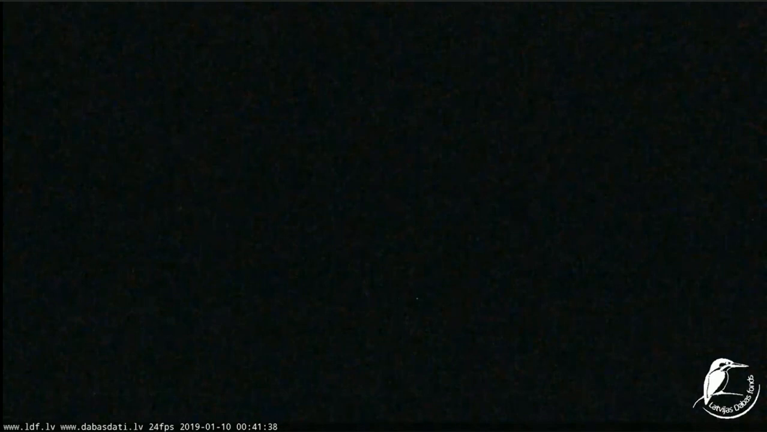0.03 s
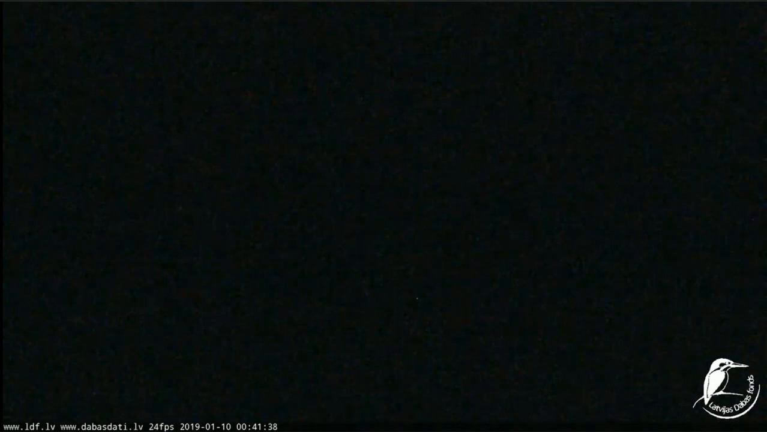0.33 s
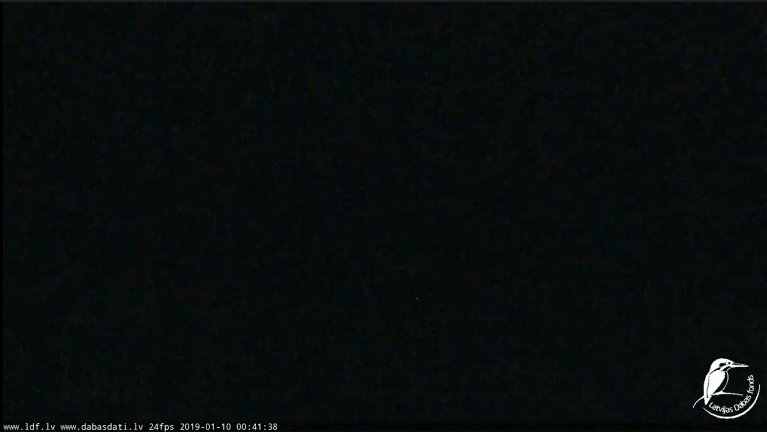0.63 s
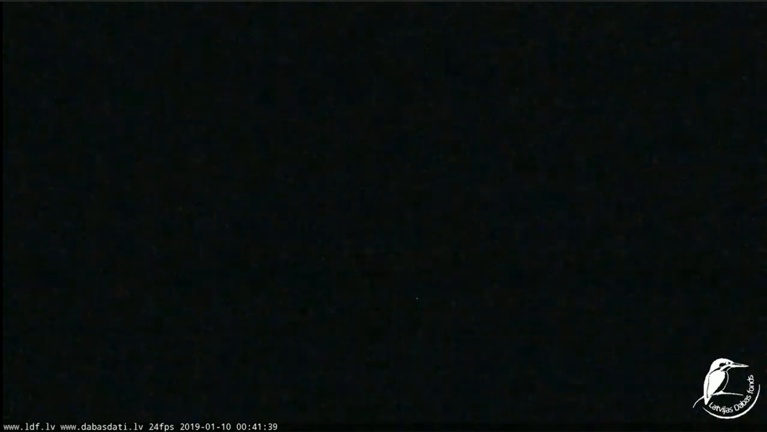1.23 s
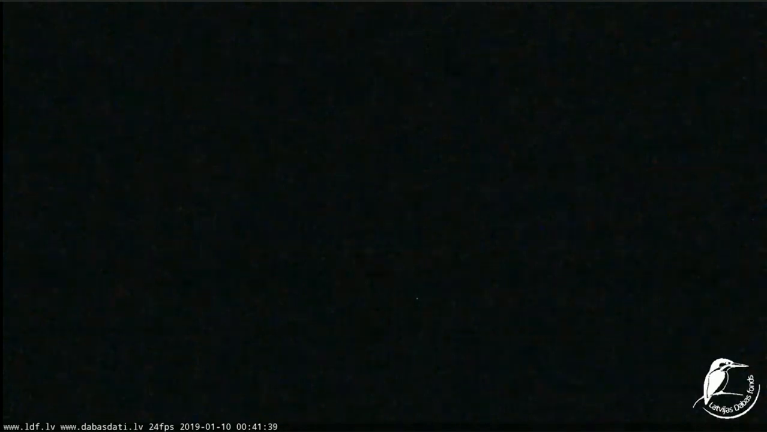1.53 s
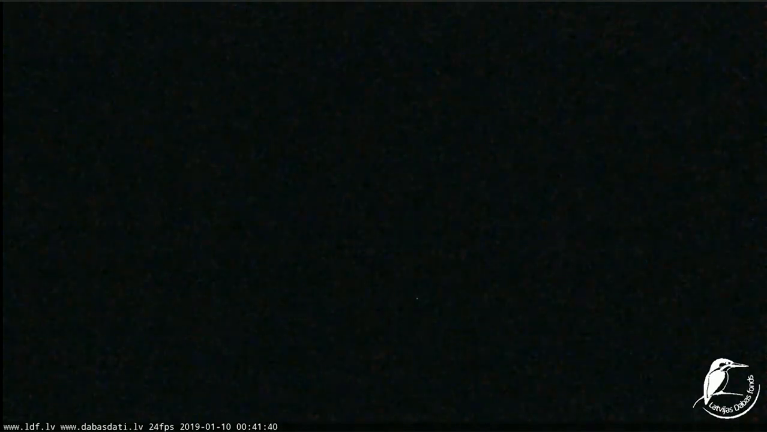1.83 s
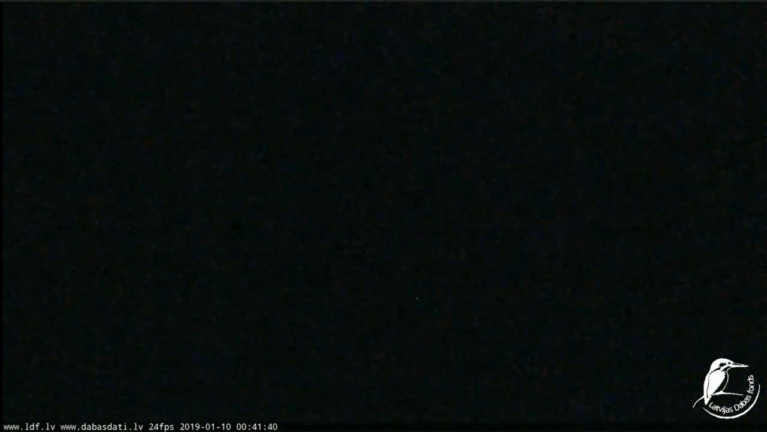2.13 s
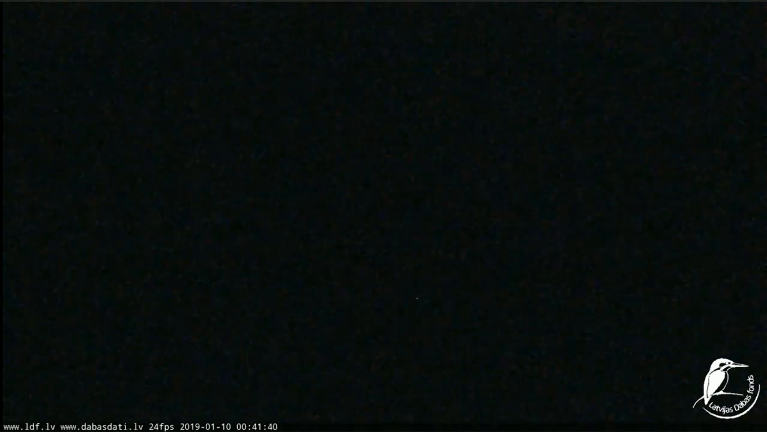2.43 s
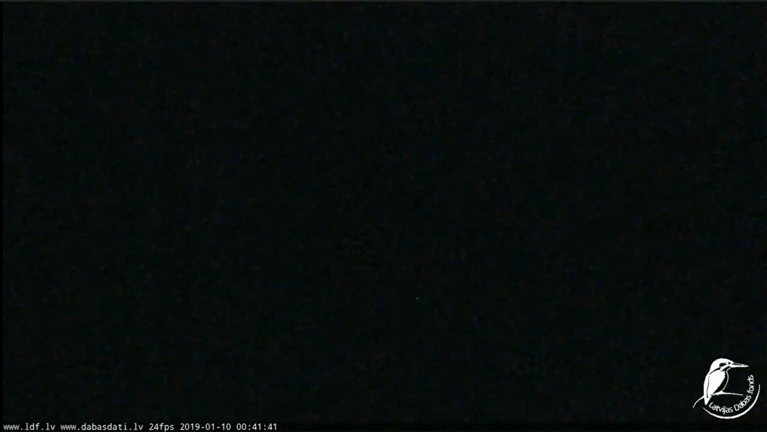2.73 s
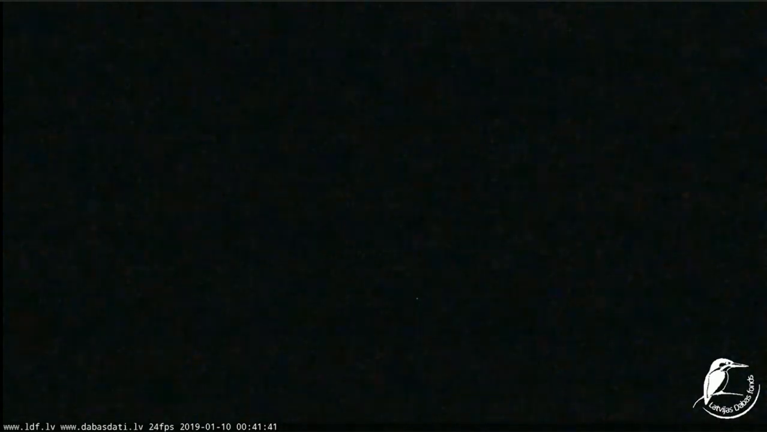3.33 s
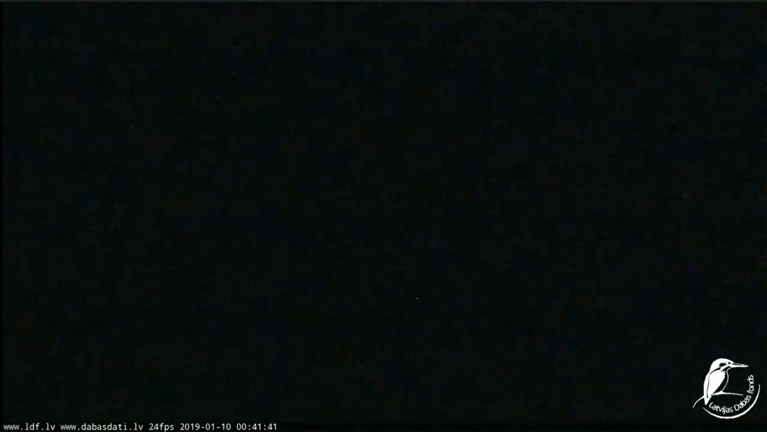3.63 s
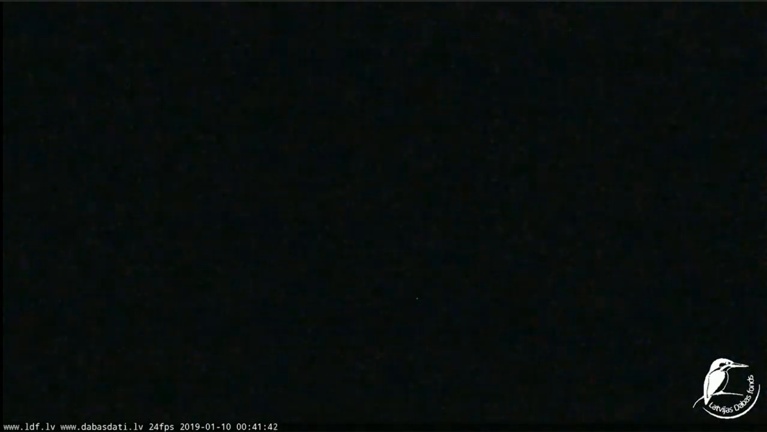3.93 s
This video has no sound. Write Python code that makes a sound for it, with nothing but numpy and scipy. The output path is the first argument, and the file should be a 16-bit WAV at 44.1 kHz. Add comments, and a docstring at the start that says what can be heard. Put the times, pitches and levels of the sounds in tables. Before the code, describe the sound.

An animal's drawn-out call of creaky trills and thin whistles in a hissing night forest.

```python
"""An unseen animal gives one long wavering call in a night forest, off among the trees.
It starts as a creaky trill of tiny pips, holds a thin whistle that turns rough and loud,
trills again, squeaks once and trails off. Near trunks scatter the call and far trees give it a
soft tail. Under it lie a low rumble of air and the steady hiss of the microphone."""
import sys
import numpy as np
from scipy import signal
from scipy.fft import rfft, irfft
from scipy.io import wavfile

SR = 44100
rng = np.random.default_rng(int(sys.argv[2]) if len(sys.argv) > 2 else 0)


def wrap_up_sound(samples):
    """Save the sound to the file named by the first command line argument, as 16-bit audio."""
    columns = np.atleast_2d(samples).T
    # keep every value between -1 and 1, then stretch to whole-number steps
    tamed = np.clip(columns, -1, 1)
    steps = np.round(tamed * 32767).astype(np.int16)
    wavfile.write(sys.argv[1], SR, steps)


N = 176400


def undb(db):
    """Decibels to gain."""
    return 10 ** (np.asarray(db) / 20)


def curve(rows):
    """A table of times and values, joined by straight lines."""
    times, values = np.array(rows).T
    return np.interp(np.arange(N) / SR, times, values)


def flutter(width_hz):
    """Complex noise of rms 1 in a steep-sided band round zero."""
    f = np.fft.fftfreq(N, 1 / SR)
    band = 1 / np.sqrt(1 + (2 * f / width_hz) ** 6)
    white = rng.standard_normal(N) + 1j * rng.standard_normal(N)
    noise = np.fft.ifft(np.fft.fft(white) * band)
    return noise / np.std(noise)


def wander(rate_hz):
    """Random drift with spread 1."""
    return np.sqrt(2) * flutter(2 * rate_hz).real


def oscillator(hz):
    """Complex unit tone that follows a pitch curve."""
    return np.exp(2j * np.pi * np.cumsum(hz) / SR)


def gate(start_s, end_s, edge_s=0.023):
    """Open between two times, with soft edges."""
    t = np.arange(N) / SR
    return np.clip(np.minimum(t - start_s, end_s - t) / edge_s + .5, 0, 1)


def air_and_hiss():
    """Even microphone hiss over a rumble of air that keeps rising gently into the deep bass."""
    # spectrum of air and microphone together: frequency_hz, relative_level_db
    noise_floor = [(100, 0.5), (150, -3.5), (250, -6), (400, -9.5), (700, -12.5), (1200, -16), (2500, -19),
                   (5000, -21), (10000, -22), (14000, -23)]
    knee_hz, rumble_db_per_octave, audible_db = 110, 4.2, -42
    f = np.fft.rfftfreq(N, 1 / SR)
    hz, db = np.array(noise_floor).T
    shape_db = np.interp(np.log(np.maximum(f, knee_hz)), np.log(hz), db)
    octaves_below = np.log2(knee_hz / np.clip(f, 10, knee_hz))
    spectrum = rfft(rng.standard_normal(N)) * undb(shape_db + rumble_db_per_octave * octaves_below)
    audible_rms = np.std(irfft(spectrum * ((f > 100) & (f < 13000)), N))
    return undb(audible_db) * irfft(spectrum, N) / audible_rms


def trill():
    """The voice breaks into short falling pips, with a rasp of hoarse air between them."""
    # runs of evenly spaced pips: start_s, end_s, pips_per_s, relative_rasp_db
    pip_runs = [(.957, .99, 43.5, -16), (1.046, 1.09, 48, -14), (1.110, 1.17, 41, -16),
                (1.350, 1.43, 43.2, -18), (1.445, 1.53, 40, -14), (2.531, 2.59, 39.5, -16),
                (2.595, 2.72, 60.6, -14), (2.728, 2.98, 53, -14), (2.991, 3.21, 61.5, -14),
                (3.576, 3.62, 53, -17), (3.635, 3.935, 45, -16)]
    # course of the trilling voice: time_s, pitch_hz, level_db
    contour = [(0.956, 1540, -47), (0.98, 1540, -38), (1.049, 1580, -43), (1.11, 1590, -37),
               (1.16, 1540, -41), (1.35, 1760, -32), (1.396, 1810, -28), (1.42, 1690, -34),
               (1.445, 1710, -41), (1.471, 1680, -33), (1.495, 1750, -28), (1.52, 1680, -36),
               (2.53, 1850, -31), (2.558, 2000, -28), (2.581, 1850, -31), (2.595, 1780, -33),
               (2.628, 1840, -34), (2.645, 1950, -28), (2.661, 1940, -27), (2.69, 1840, -33),
               (2.711, 1810, -38), (2.728, 1890, -34), (2.766, 1970, -27), (2.786, 1900, -36),
               (2.807, 1770, -32), (2.84, 1890, -28), (2.861, 1960, -29), (2.917, 2000, -30),
               (2.953, 1920, -28), (2.972, 1910, -28), (2.991, 1800, -30), (3.025, 1980, -24),
               (3.04, 1940, -24), (3.056, 1920, -28), (3.074, 1890, -30), (3.122, 2060, -22),
               (3.136, 2010, -23), (3.152, 1970, -29), (3.169, 1900, -33), (3.576, 2010, -30),
               (3.595, 1990, -27), (3.638, 1740, -36), (3.68, 1790, -34), (3.723, 1880, -30),
               (3.79, 1790, -34), (3.812, 1790, -32), (3.878, 1790, -38), (3.902, 1750, -36),
               (3.928, 1550, -44)]
    pip_gain_db, scatter_db, jitter_s, sag_hz_per_s = -1, 2, 0.00029, 25000
    rise_s, fall_s, reference_hz = 0.0015, 0.0026, 1970
    times, pitch, db = np.array(contour).T
    t = np.arange(N) / SR
    pips, rasp_gain = np.zeros(N), np.zeros(N)
    for start, end, rate, rasp_db in pip_runs:
        rasp_gain = np.maximum(rasp_gain, undb(rasp_db) * gate(start, end))
        chance = rng.standard_normal((32, 3))
        for at, (late, loud, phase) in zip(np.arange(start, end, 1 / rate), chance):
            hz = np.interp(at, times, pitch)
            near = np.abs(t - at) < .02
            from_peak_s = t[near] - at - jitter_s * late
            stretch = (hz / reference_hz) ** 1.5  # higher pips last longer
            width_s = np.where(from_peak_s < 0, rise_s, fall_s) * stretch
            peak = undb(np.interp(at, times, db) + pip_gain_db + scatter_db * loud)
            envelope = peak * np.exp(-.5 * (from_peak_s / width_s) ** 2)
            cycles = hz * from_peak_s - .5 * sag_hz_per_s * from_peak_s ** 2 + phase
            pips[near] += envelope * np.sin(2 * np.pi * cycles)
    rasp = (flutter(width_hz=490) * oscillator(np.interp(t, times, pitch))).real
    return pips + rasp_gain * undb(np.interp(t, times, db)) * rasp


def forest(call):
    """The direct call, quick scatter from near trunks, then a soft tail from the far trees."""
    trunks_s, trunks_db = .012, -15
    build_s, t60_s, tail_db = 0.01, 2, -10.5
    t = np.arange(2 * SR) / SR
    trunks = rng.standard_normal(len(t)) * t * np.exp(-t / trunks_s)
    tail = rng.standard_normal(len(t)) * (1 - np.exp(-t / build_s)) * np.exp(-np.log(1000) * t / t60_s)
    echo = undb(trunks_db) * trunks / np.linalg.norm(trunks) + undb(tail_db) * tail / np.linalg.norm(tail)
    return call + signal.fftconvolve(call, echo)[:N]


def whistle(contour):
    """A near-pure tone with a weak, breathy octave; under strain it turns hoarse and buzzes."""
    # hoarseness of the voice: time_s, roughness_share
    roughness = [(1.25, .7), (1.5, .4), (1.6, .12), (1.93, .1), (2.0, .8), (2.06, .75), (2.12, .9),
                 (2.17, .6), (2.2, .4), (2.225, .12), (2.26, .45), (2.28, .25), (2.32, .5), (3.24, .3)]
    # strength of the octave against the fundamental: time_s, level_db
    octave_level = [(1.25, -9), (1.55, -8.5), (1.68, -16), (1.76, -7), (1.86, -26), (2.03, -12),
                    (2.15, -26), (2.3, -34)]
    gain_db, wobble, hoarse_above_hz = -2.5, 0.00804, 110
    buzz_hz, buzz_db, octave_breath = 385, -16, 0.59
    t = np.arange(N) / SR
    times, pitch, db = np.array(contour).T
    tone = oscillator(np.interp(t, times, pitch) * (1 + wobble * wander(rate_hz=74)))
    hoarse = curve(roughness) * flutter(width_hz=620) * oscillator(np.full(N, hoarse_above_hz))
    # a second oscillator puts a line above the strained whistle
    buzz = oscillator(buzz_hz * (1 + 0.0284 * wander(rate_hz=39.5)))
    buzz *= undb(buzz_db) * gate(start_s=2.195, end_s=2.325)
    octave = undb(curve(octave_level)) * (1 + octave_breath * flutter(width_hz=200))
    voice = (tone + octave * tone ** 2) * (1 + hoarse + buzz)
    envelope = undb(np.interp(t, times, db) + gain_db) * gate(times[0], times[-1])
    return np.sqrt(2) * voice.real * envelope


def whistled_notes():
    """The unbroken notes of the call, all in the same whistling voice."""
    # faint opening whine: time_s, pitch_hz, level_db
    first_whine = [(1.17, 1415, -48), (1.2, 1334, -52), (1.24, 1458, -50), (1.3, 1345, -64)]
    # held whistle that climbs and swells: time_s, pitch_hz, level_db
    held_note = [(1.41, 1594, -64), (1.416, 1584, -47), (1.492, 1658, -46), (1.562, 1485, -47),
                 (1.598, 1558, -45), (1.638, 1437, -55), (1.658, 1520, -43.5), (1.676, 1474, -50),
                 (1.75, 1650, -40.5), (1.84, 1427, -46), (1.9, 1693, -36.5), (1.93, 1535, -42),
                 (1.952, 1593, -36), (2.01, 1716, -38), (2.034, 1610, -42), (2.062, 1699, -38),
                 (2.078, 1653, -43.5), (2.104, 1748, -34), (2.124, 1830, -39), (2.138, 1826, -33),
                 (2.166, 1749, -36.5), (2.232, 1867, -24), (2.26, 1814, -36.5), (2.272, 1824, -29),
                 (2.31, 1858, -30), (2.336, 1500, -51), (2.345, 1443, -70)]
    # late squeak, up and down: time_s, pitch_hz, level_db
    squeak = [(3.185, 1563, -42), (3.205, 1578, -42), (3.217, 1955, -36), (3.23, 2008, -26),
              (3.243, 2157, -24.5), (3.26, 1920, -33.5), (3.278, 1740, -35)]
    # falling whine as the call trails off: time_s, pitch_hz, level_db
    last_whine = [(3.925, 1540, -44), (3.955, 1420, -49), (4.0, 1340, -56)]
    return sum(whistle(note) for note in (first_whine, held_note, squeak, last_whine))


def scene():
    """The call among the trees reaches one microphone, over air and hiss."""
    call = trill() + whistled_notes()
    return (forest(call) + air_and_hiss())[None]


def record(dry):
    """The sound begins after a brief silence, sits a little off zero and has its top cut."""
    zero_offset, top_hz = 0.071, 14000
    gated = (dry + zero_offset) * gate(start_s=.035, end_s=np.inf, edge_s=.001)
    return signal.sosfilt(signal.ellip(12, .1, 70, top_hz, fs=SR, output="sos"), gated)


dry = scene()
out = record(dry)
wrap_up_sound(out)
```